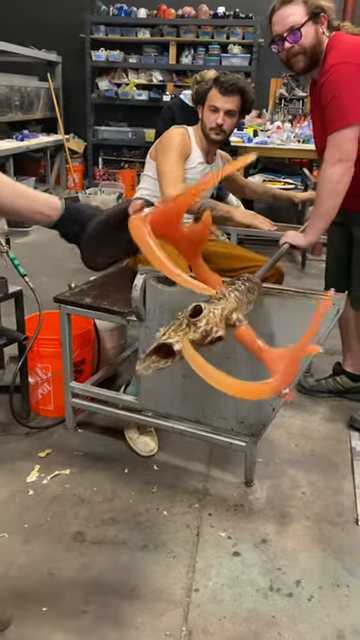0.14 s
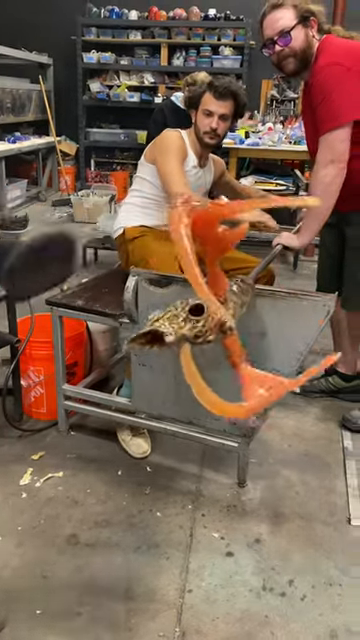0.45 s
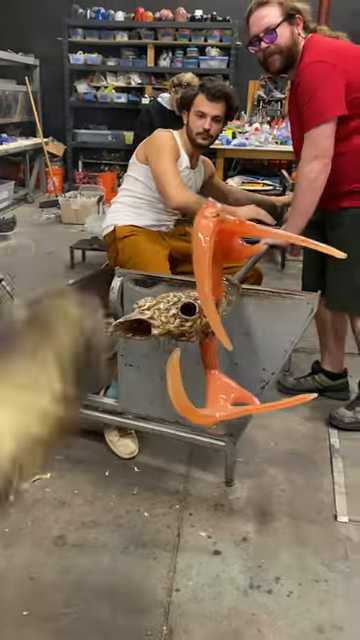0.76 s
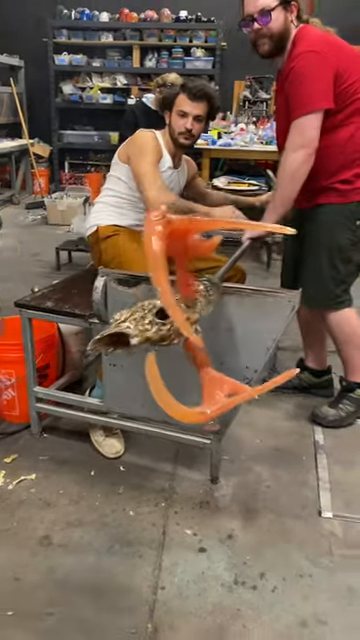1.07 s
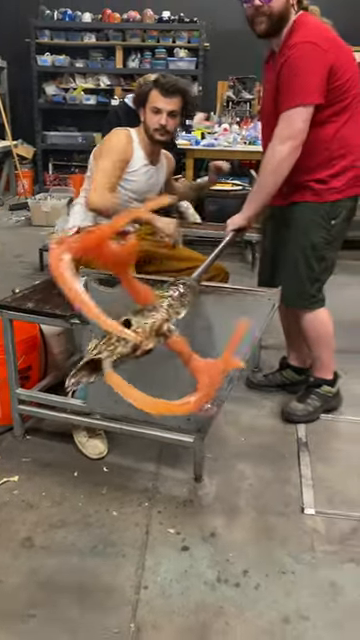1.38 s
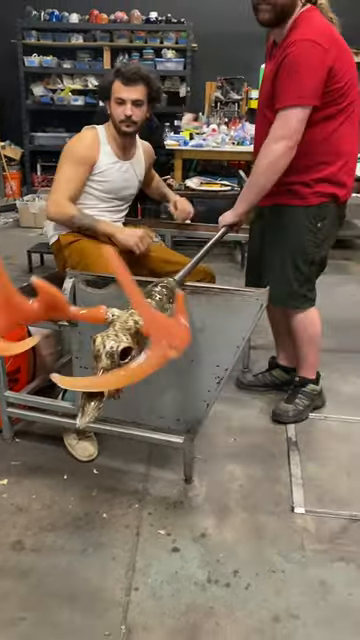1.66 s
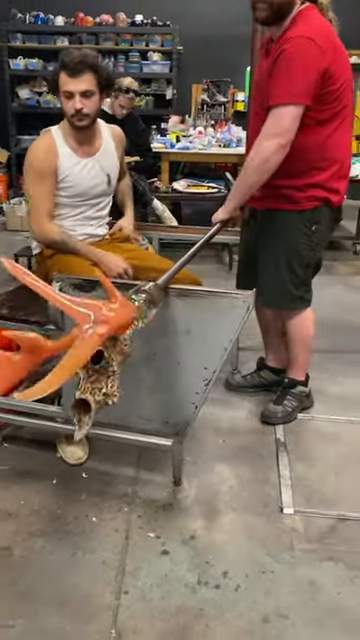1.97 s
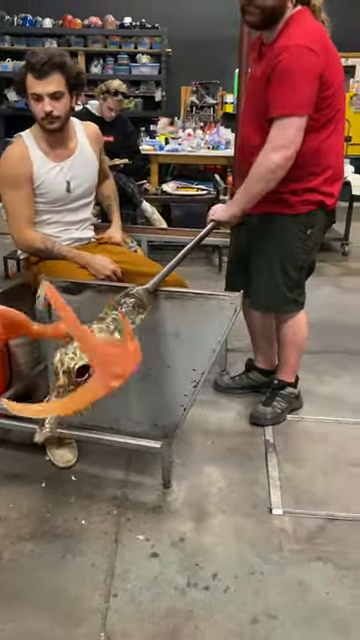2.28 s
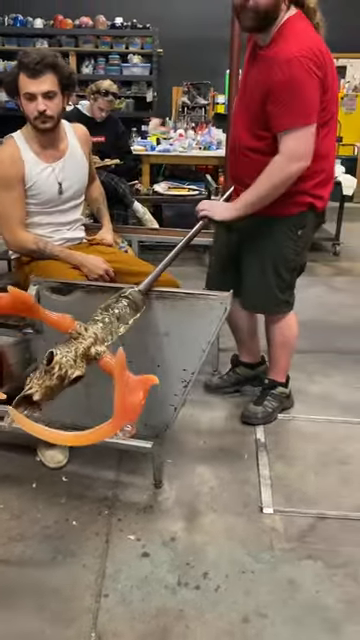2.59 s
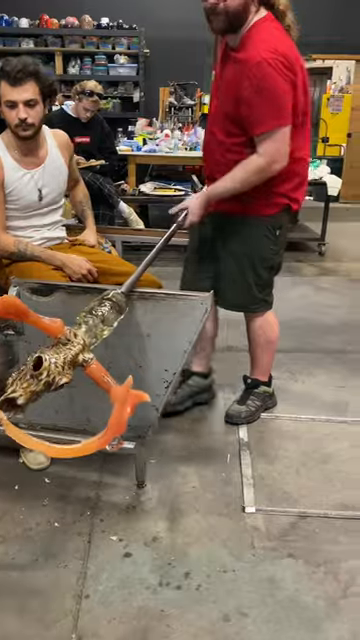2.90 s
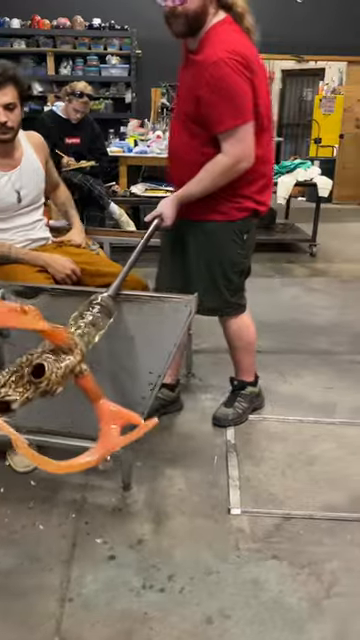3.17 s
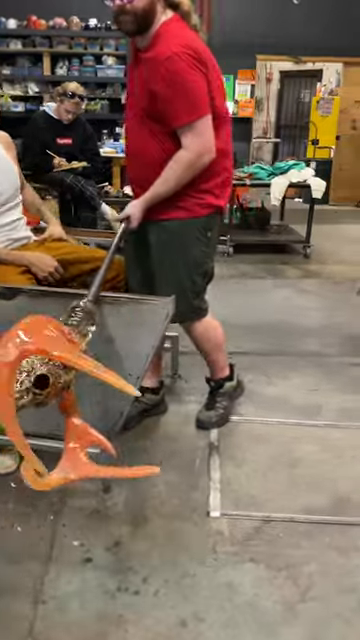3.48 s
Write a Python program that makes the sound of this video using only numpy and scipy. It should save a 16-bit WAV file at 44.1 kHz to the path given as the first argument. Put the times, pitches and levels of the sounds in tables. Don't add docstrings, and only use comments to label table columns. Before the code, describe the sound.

A glass furnace roars steadily in a workshop, with a brief metallic clank near the end

```python
import sys
import numpy as np
from scipy import signal
from scipy.fft import rfft, irfft, next_fast_len
from scipy.io import wavfile
from scipy.ndimage import uniform_filter1d, map_coordinates

SR = 44100
rng = np.random.default_rng(int(sys.argv[2]) if len(sys.argv) > 2 else 0)


def volts(x):
    e = np.asarray(x, float) / 20
    return 10 ** e


def output_pcm(signal):
    pcm = np.clip(np.atleast_2d(signal).T, -1, 1) * 32767
    wavfile.write(sys.argv[1], SR, np.round(pcm).astype(np.int16))


N = 160524


def unit(x):
    return x / np.sqrt(np.mean(x ** 2) + 1e-20)


def along(points, hz):
    f, v = np.transpose(points)
    return np.interp(np.log(hz + 1), np.log(f + 1), v)


def closed(points):
    return lambda hz: volts(along(points, hz)) * (hz > points[0][0]) * (hz < points[-1][0])


def curve(rows):
    return np.interp(np.arange(N) / SR, *np.transpose(rows))


def wobble(rate):
    knots = rng.standard_normal(int(N * rate / SR) + 4)
    return map_coordinates(knots, [np.arange(N) * rate / SR])


def filtered(x, response):
    m = next_fast_len(N + 8192)
    return irfft(rfft(x, m) * response(np.fft.rfftfreq(m, 1 / SR)), m)[..., :N]


def rush(gain, patchy_db):
    z = signal.stft(rng.standard_normal((2, N)), nperseg=512)[2]
    field = uniform_filter1d(rng.standard_normal(z.shape[1:]), size=6, axis=0)
    field = uniform_filter1d(field, size=12, axis=1)
    patchy = signal.istft(z * volts(patchy_db * unit(field)), nperseg=512)[1][:, :N]
    return unit(filtered(patchy, gain))


def narrow(lines):
    def power(f):
        total = 0
        for center, width, db in lines:
            damping = (f * width) ** 2
            peak = damping / ((center * center - f * f) ** 2 + damping)
            total = total + volts(2 * db) * SR / np.pi / width * peak
        return total
    return filtered(rng.standard_normal((2, N)), lambda f: np.sqrt(power(f)))


def tone(hz, db):
    phase = 2 * np.pi * np.cumsum(hz) / SR
    return np.sqrt(2) * volts(db) * np.array([np.sin(phase), np.cos(phase)])


def hall(x):
    t60_s = .45
    t = np.arange(SR // 2) / SR
    tail = rng.standard_normal((2, len(t))) * volts(-60 * t / t60_s)
    return signal.fftconvolve(x[None], tail / np.linalg.norm(tail[0]), axes=1)[:, :N]


STRIKE_S = .0008


def ringing(t, hz, t60):
    u = np.maximum(t, 0)
    wander = .045 * np.cumsum(rng.standard_normal(len(u)))
    return np.sin(2 * np.pi * hz * u + wander) * volts(-60 * u / t60) * (1 - np.exp(-u / STRIKE_S))


# (time [s], level [dB], pitch [Hz], decay t60 [s])
CHIP_PINGS = [
    (2.524, -36, 14150, .06),
    (2.538, -43, 14150, .08),
    (2.551, -48, 14150, .12),
    (2.567, -50, 14150, .2),
]


def chips():
    t = np.arange(N) / SR
    return sum(volts(db) * ringing(t - s, hz, t60) for s, db, hz, t60 in CHIP_PINGS)


# (middle [s], length [s], level [dB], pitch [Hz])
SCRAPES = [
    (.2, .03, -61, 13500),
    (.23, 0.13, -62, 6830),
    (.48, .07, -55, 9600),
    (.88, 0.044, -58, 12000),
    (1.74, 0.045, -43.5, 4550),
    (2.495, 0.11, -55.5, 11000),
    (3.45, .04, -56.5, 3800),
]
SCRAPE_SPREAD = [.1, 0.022, 0.16, .2, 0.24, 0.35, .3]


def scrapes():
    t, out = np.arange(N) / SR, np.zeros(N)
    for (s, length, db, hz), spread in zip(SCRAPES, SCRAPE_SPREAD):
        band = unit(filtered(rng.standard_normal(N), lambda f: np.exp(-((f / hz - 1) / spread) ** 2)))
        out += volts(db) * band * np.exp(-(2 * (t - s) / length) ** 2)
    return out


# (time [s], level [dB], crack t60 [s], struck piece [0 rail, 1 pipe])
TAPS = [(2.7975, -48, .04, 0), (2.8035, -46, .04, 0), (2.829, -50, .06, 0), (2.8745, -45, .03, 1),
        (2.8785, -38, .05, 1), (2.886, -44, .05, 1), (2.892, -43, .07, 1), (2.901, -47, .07, 1),
        (2.913, -46.5, .08, 1), (2.928, -49, .12, 1), (2.945, -52, .1, 1), (2.96, -54, .1, 1)]
# (frequency [Hz], level [dB], decay t60 [s])
RAIL_MODES = [(2476, 4, .14), (3050, -1, .06), (3828, -7, .1), (4856, 6, .08), (5615, -8, .08),
              (9400, -9, .04)]
# (frequency [Hz], level [dB], decay t60 [s])
PIPE_MODES = [(1523, -4, .25), (2150, -7, .2), (2509, -1, .25), (3149, -6, .2), (4226, -3, .1),
              (4860, -4, .08), (5600, 3, .08), (6650, -6, .3), (8495, -8, .12), (9776, -7, .08),
              (10400, -2, .06), (11750, -6, .04), (14050, -15, .05)]
# (frequency [Hz], density [dB per Hz])
CRACK_COLOUR = [(900, -30), (2000, 9), (3500, 6), (6000, 0), (11500, -7), (13000, -25)]


def taps():
    crack_db = 9.5
    out = np.zeros(N)
    u = np.arange(SR // 4) / SR
    grit = unit(filtered(rng.standard_normal(N), closed(CRACK_COLOUR)))
    for s, db, crack_t60, piece in TAPS:
        i = int(s * SR)
        modes = [RAIL_MODES, PIPE_MODES][round(piece)]
        ring = sum(volts(level + rng.normal(0, 0.75)) * ringing(u, hz, t60) for hz, level, t60 in modes)
        envelope = volts(crack_db - 60 * u / crack_t60) * (1 - np.exp(-u / STRIKE_S))
        out[i:i + len(u)] += volts(db) * (ring + envelope * grit[i:i + len(u)])
    return out


# (time [s], level [dB])
AIR_FLOW = [(0.0, -38.5), (1.38, -39), (2.87, -38.5), (3.11, -39.5), (3.64, -38)]
# (frequency [Hz], density [dB per Hz])
AIR_BODY = [(170, -59), (225, 1), (300, -2), (520, -1), (620, -8), (1250, -8.5), (1900, -14.5),
            (2300, -20.5)]
# (frequency [Hz], density [dB per Hz])
AIR_HISS = [(1500, -9.5), (2200, 0.5), (2900, 0), (3600, -4.5), (7400, -16), (8300, -14), (14300, -27.5),
            (15700, -24)]
# (frequency [Hz], width [Hz], level [dB])
BLADE_WHINE = [(1491, 3, -55), (1814, 25, -59), (2251, 12, -59), (2488, 30, -56), (2796, 6, -57),
               (2981, 6, -61), (3150, 15, -60)]
# (time [s], level [dB])
WHISTLE = [(0, -55), (1.9, -56), (2.3, -51), (2.6, -54), (3.0, -52), (3.25, -49), (3.64, -49.5)]


def blower():
    body_db, hiss_db = 4, -2.5
    body = volts(body_db + 0.054 * wobble(3.2)) * rush(closed(AIR_BODY), patchy_db=0.64)
    hiss = volts(hiss_db + 0.3 * wobble(5.3)) * rush(closed(AIR_HISS), patchy_db=.9)
    whistle = tone(hz=1398 + wobble(5.98), db=curve(WHISTLE) + 2 * wobble(7.35))
    return volts(curve(AIR_FLOW)) * (body + hiss) + narrow(BLADE_WHINE) + whistle


# (frequency [Hz], width [Hz], level [dB])
CHAMBER_HUMS = [(207, 12, -44), (257, 14, -47), (287, 20, -44), (343, 8, -50), (372, 6, -47), (395, 7, -48),
                (422, 9, -47), (510, 40, -47), (675, 14, -54), (747, 20, -48), (912, 25, -53),
                (1194, 40, -52)]
# (time [s], level [dB])
MAIN_HUM = [(0.0, -42.5), (0.39, -32.5), (0.42, -43), (1.35, -41.5), (1.37, -35), (1.95, -45), (1.97, -50),
            (2.08, -38), (2.63, -46), (2.69, -31.5), (2.75, -47), (2.84, -34), (3.42, -39.5), (3.54, -28),
            (3.58, -41), (3.64, -39.5)]


def chamber():
    main = tone(hz=287 + 11 * wobble(25), db=curve(MAIN_HUM) - 2.5 + 3.4 * wobble(14))
    return narrow(CHAMBER_HUMS) + main


def steady(pair):
    size = int(.12 * SR)
    power = uniform_filter1d(uniform_filter1d(pair[0] ** 2, size=size), size=size)
    return unit(pair / np.sqrt(np.abs(power) + 1e-3))


# (time [s], level [dB])
FLAME = [(0.0, -21.5), (0.16, -21), (0.18, -26.5), (0.36, -18), (0.43, -22.5), (0.99, -23), (1.01, -17),
         (1.06, -23.5), (1.24, -19), (1.38, -27.5), (1.43, -20), (1.9, -21.5), (2.05, -27), (2.43, -20.5),
         (2.47, -30.5), (2.5, -19), (2.55, -23), (3.64, -21)]
# (frequency [Hz], density [dB per Hz])
RUMBLE = [(20, -28), (30, -30), (43, -16.5), (53, 1), (82, 1.5), (105, -1.5), (140, -9.5), (215, -20.5)]


def burner():
    return volts(curve(FLAME)) * steady(rush(closed(RUMBLE), patchy_db=0.0))


# (frequency [Hz], likeness [0 to 1])
ALIKE = [(150, 1), (500, 0.93), (900, 0.48), (1900, 0.7), (2250, 0.25), (2650, 0.6), (3600, 0.16),
         (6800, 0.97)]
# (frequency [Hz], phase [rad])
RIGHT_LEAD = [(150, 0), (900, .6), (1900, .1), (2600, -2.8), (3300, -2.6), (4000, -1.3), (5300, -.9),
              (6200, -1.6)]
# (frequency [Hz], level [dB])
LEFT_SHADE = [(150, 0), (400, -2), (800, -3), (1250, -2.6), (1700, 0.5)]


def ports(pair):
    lag_s = .000169

    def turn(hz):
        return np.arccos(np.clip(along(ALIKE, hz), 0, .9994)) / 2

    def lead(hz):
        return along(RIGHT_LEAD, hz) - 2 * np.pi * lag_s * np.maximum(hz - RIGHT_LEAD[-1][0], 0)

    def tilt(hz):
        return volts(along(LEFT_SHADE, hz) / 2) * np.exp(-.5j * lead(hz))

    same, other = filtered(pair, lambda hz: np.array([np.cos(turn(hz)), np.sin(turn(hz))]))
    return filtered(np.array([same + other, same - other]), lambda hz: np.array([tilt(hz), 1 / tilt(hz)]))


def scene():
    bench, glass = taps() + scrapes(), chips()
    direct = bench * [[1], [0]]
    room = volts(-8) * hall(bench + glass)
    furnace = burner() + chamber() + blower()
    return ports(furnace + direct + room) + glass * [[1], [-.4]]


def top_cut(x):
    return signal.sosfilt(signal.butter(12, 16650, fs=SR, output="sos"), x)


def record(dry):
    mix = filtered(dry, lambda hz: hz < 15720)
    return top_cut(mix)


dry = scene()
out = record(dry)
output_pcm(out)
```